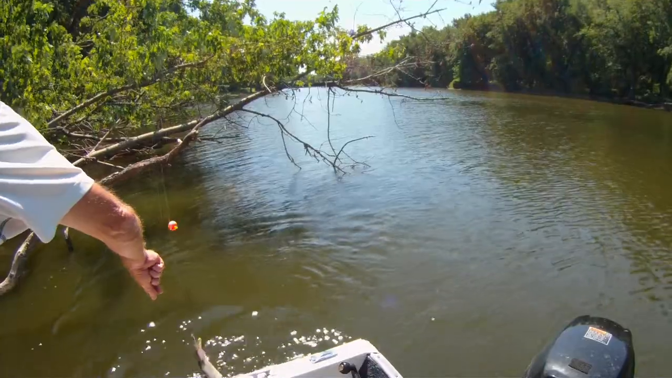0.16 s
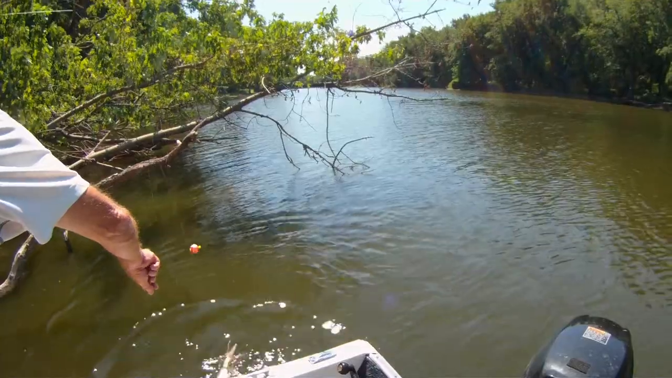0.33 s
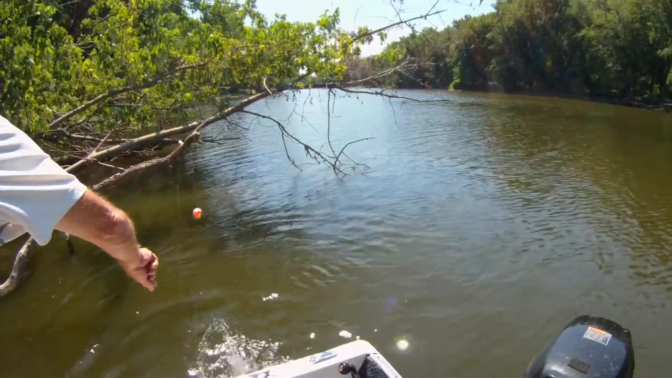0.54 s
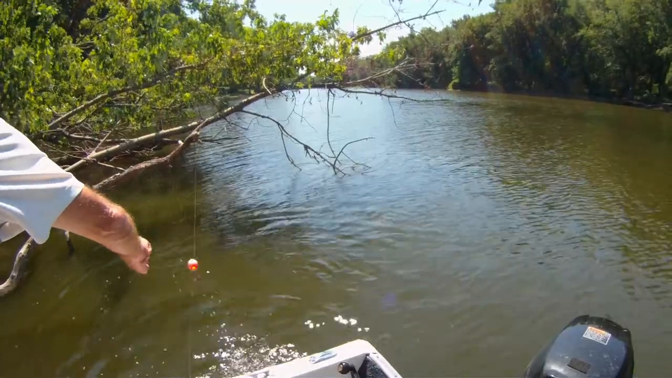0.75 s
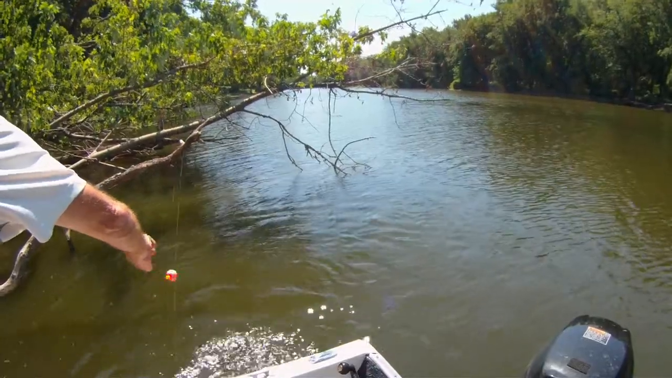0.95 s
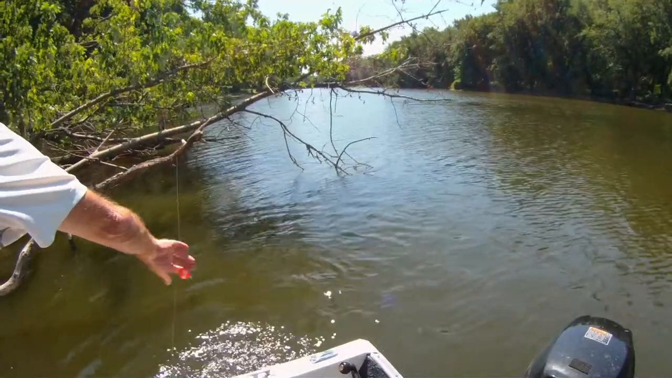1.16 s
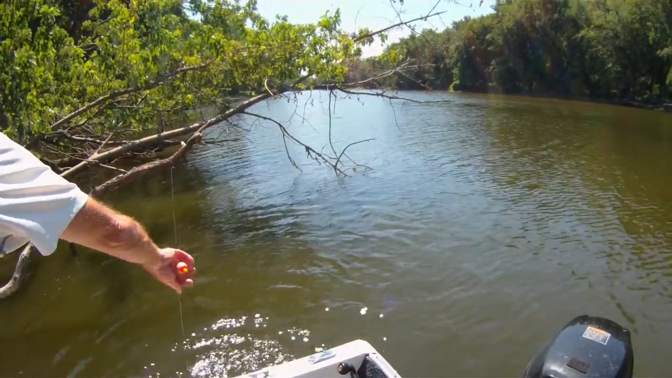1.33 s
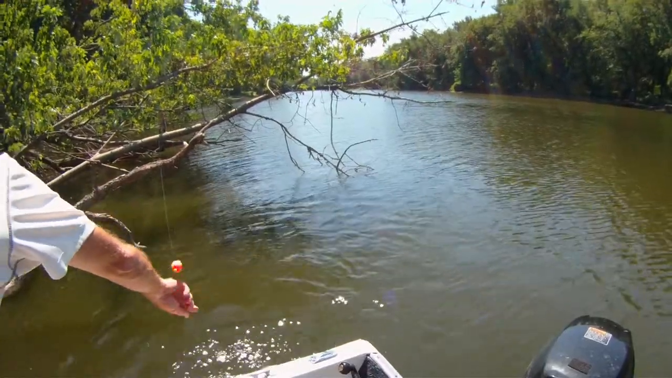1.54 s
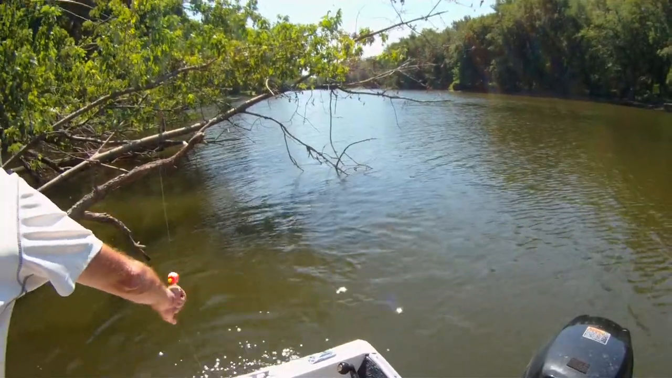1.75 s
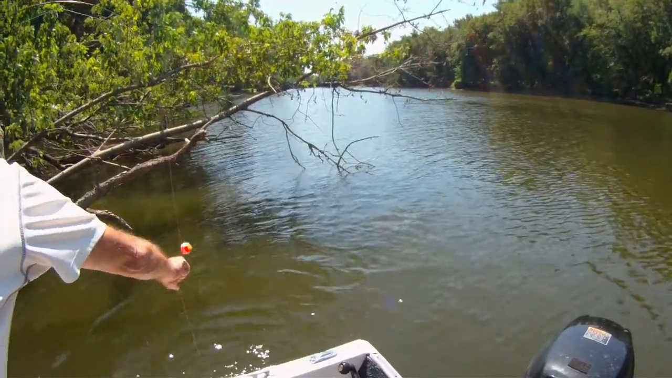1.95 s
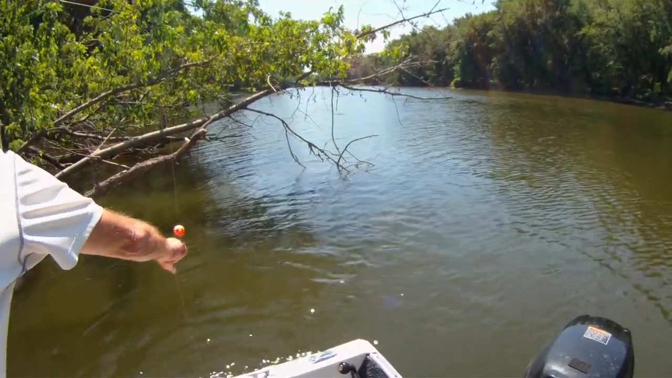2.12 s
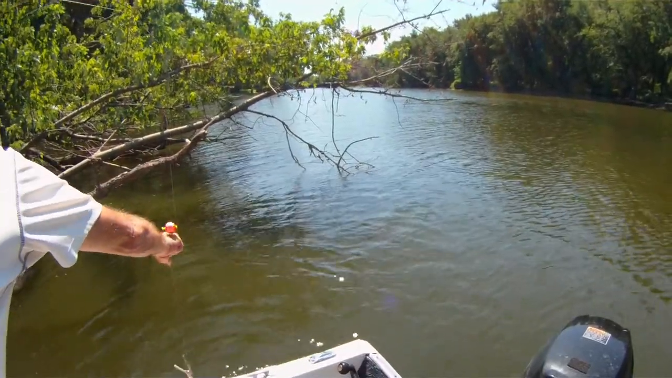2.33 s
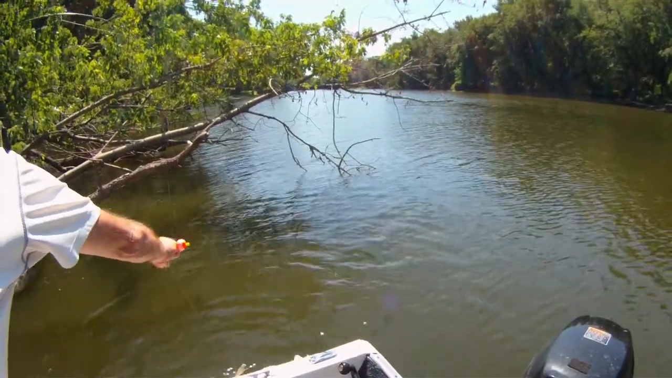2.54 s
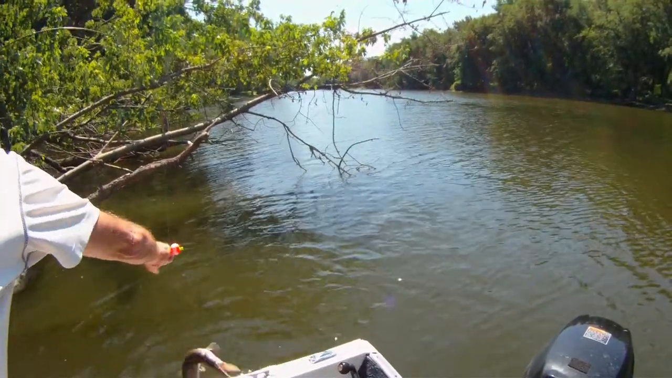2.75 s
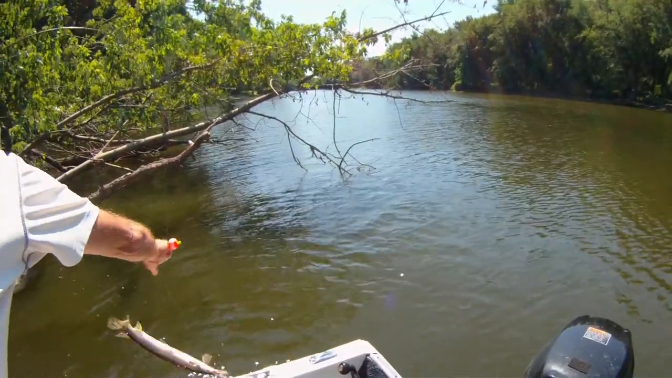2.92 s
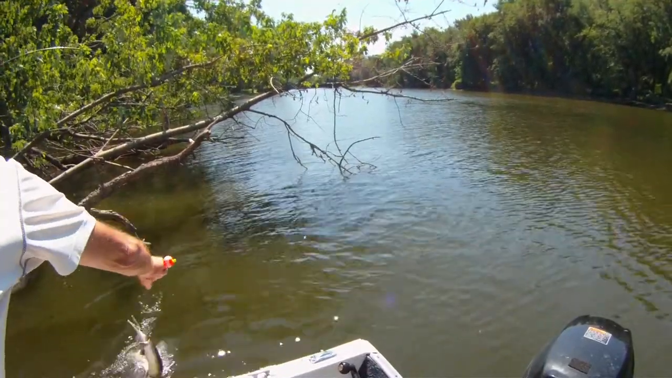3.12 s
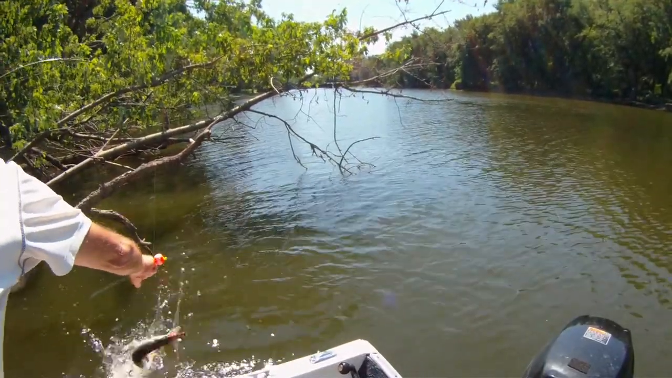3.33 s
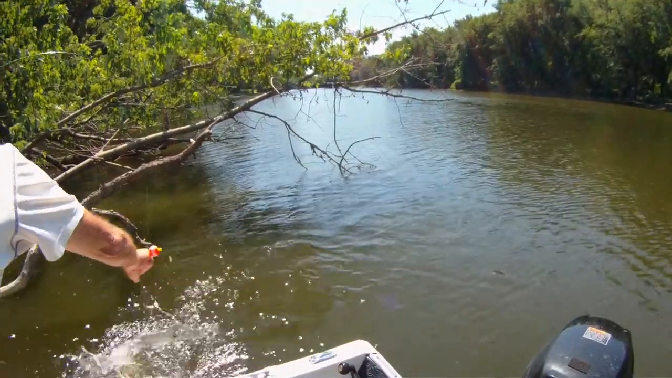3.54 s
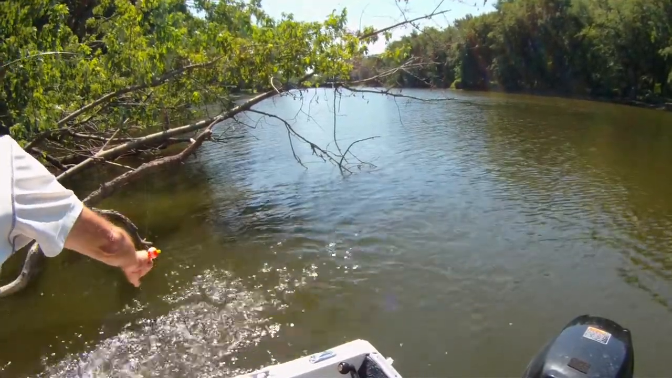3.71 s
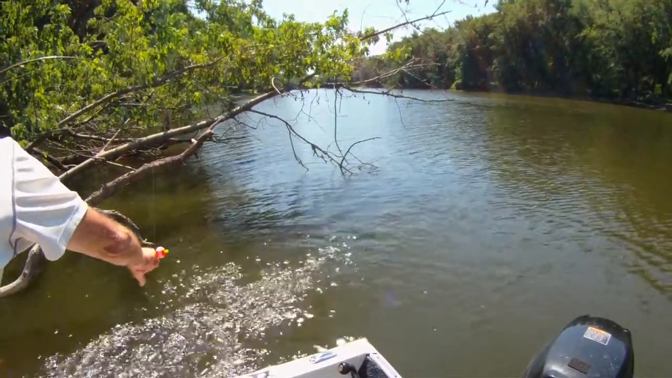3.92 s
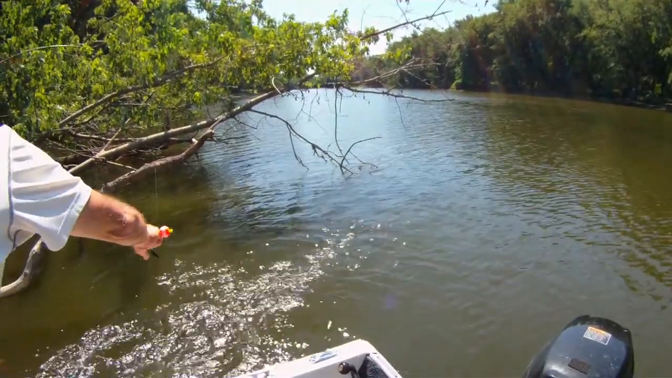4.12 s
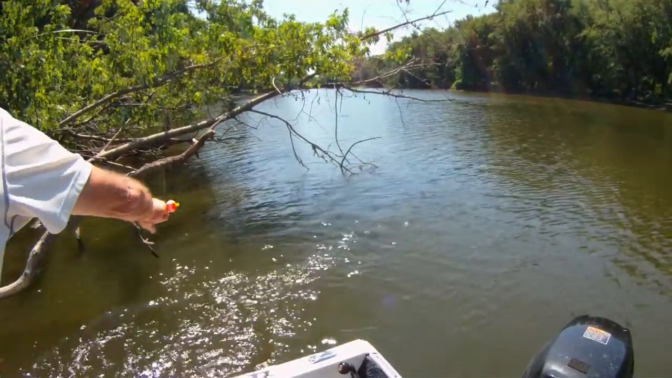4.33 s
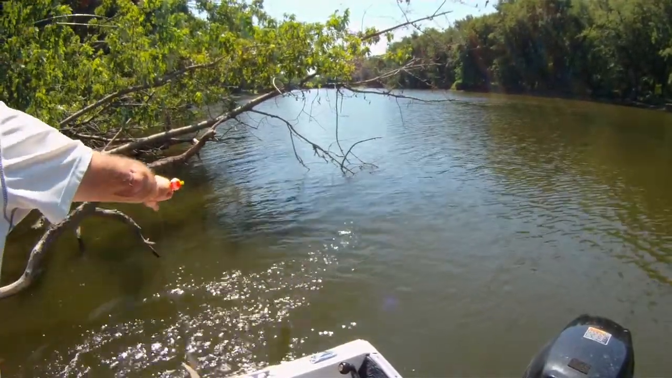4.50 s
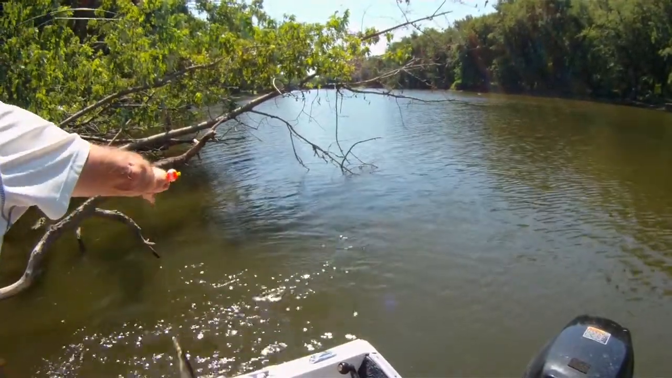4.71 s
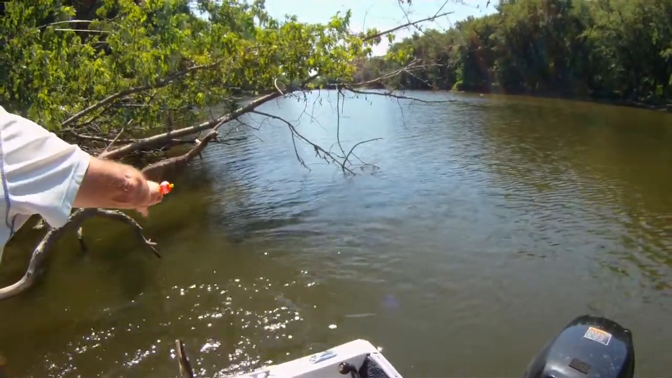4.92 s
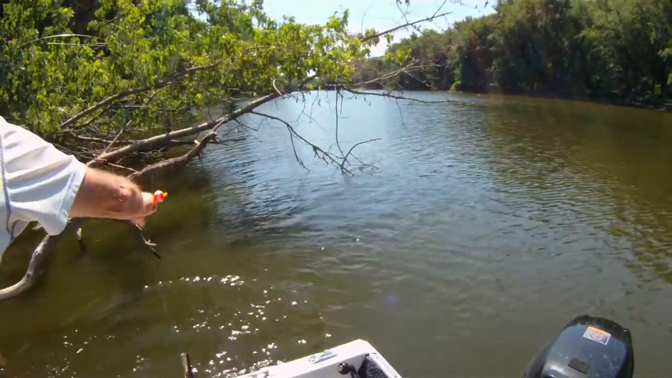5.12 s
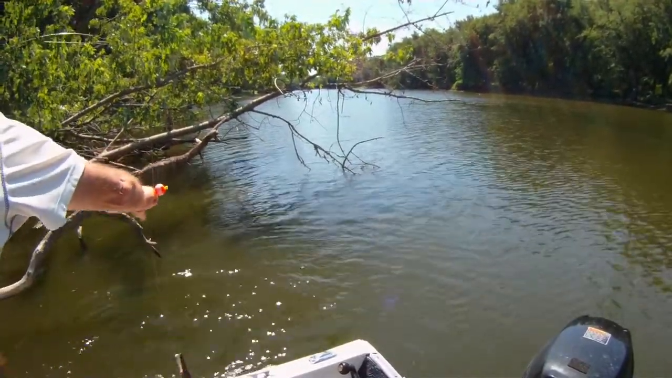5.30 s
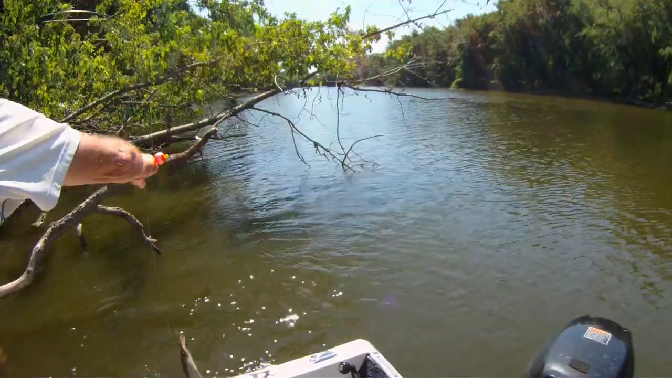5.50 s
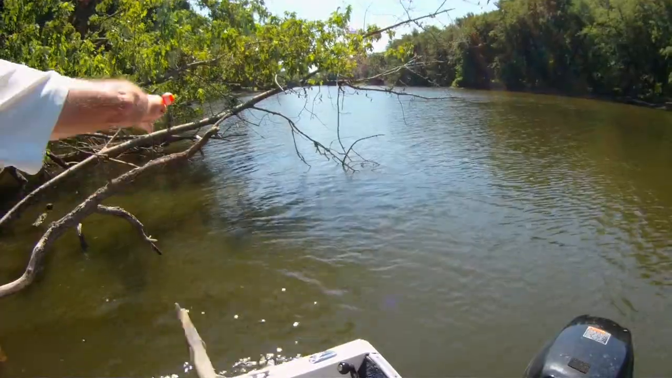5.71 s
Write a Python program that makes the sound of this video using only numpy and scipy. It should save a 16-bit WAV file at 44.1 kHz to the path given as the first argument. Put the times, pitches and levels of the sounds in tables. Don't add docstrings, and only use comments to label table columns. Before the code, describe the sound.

A hooked fish thrashes beside a small boat, with wet slaps, bubbling plops and one sharp crack, over soft river hiss and faint insects.

```python
import sys
import numpy as np
from scipy import signal
from scipy.fft import rfft, irfft, next_fast_len
from scipy.io import wavfile
from scipy.ndimage import uniform_filter1d

SR = 44100
rng = np.random.default_rng(int(sys.argv[2]) if len(sys.argv) > 2 else 0)


def generate_wav(signal):
    frames = np.transpose(np.atleast_2d(signal))
    scaled = np.clip(frames, -1, 1) * 32767
    pcm = np.round(scaled).astype(np.int16)
    wavfile.write(sys.argv[1], SR, pcm)


def invert_db(x):
    u = np.asarray(x, float) / 20
    return 10 ** u


N = 258418
TIME_S = np.arange(N) / SR


def rms_one(x):
    return x / np.sqrt(np.mean(x ** 2) + 1e-20)


def band(x, low_hz, high_hz, order=2):
    edges_hz = [low_hz, min(high_hz, .45 * SR)]
    return signal.sosfilt(signal.butter(order, edges_hz, "band", fs=SR, output="sos"), x)


def resonance(x, hz, width_hz):
    r = np.exp(-np.pi * width_hz / SR)
    zeros = np.array([1, 0, -1]) * (1 - r * r) / 2
    return signal.lfilter(zeros, [1, -2 * r * np.cos(2 * np.pi * hz / SR), r * r], x)


def drift(rate_hz):
    r = np.exp(-80 * np.pi * rate_hz / SR)
    white = rng.standard_normal(N // 40 + 2002)
    slow = signal.lfilter([1], [1, -2 * r, r * r], white)[2000:]
    return np.interp(np.arange(N) / 40, np.arange(len(slow)), rms_one(slow))


def gate(start_s, end_s, fade_s):
    return np.interp(TIME_S, [start_s - fade_s, start_s, end_s, end_s + fade_s], [0, 1, 1, 0])


def add(out, piece, start_s):
    i = max(round(start_s * SR), 0)
    out[i:i + len(piece)] += piece[:N - i]


# pitch_hz, density_db (per Hz)
AIR_SPECTRUM = [(28, -30), (45, -20), (75, -15.5), (140, -9), (250, -10), (450, -11.5), (900, -9),
                (1600, -15.5), (2400, -10.5), (3200, -14), (5600, -5.5), (6650, -13.5), (7000, -16.5),
                (7950, -24)]


def air():
    size = next_fast_len(N)
    points_hz, points_db = np.transpose(AIR_SPECTRUM)
    hz = np.arange(size // 2 + 1) * SR / size + 1
    colour = invert_db(np.interp(np.log(hz), np.log(points_hz), points_db))
    noise = irfft(colour * rfft(rng.standard_normal(size)), size)[:N]
    return invert_db(-52 + 0.16 * drift(3.6)) * rms_one(noise)


# time_s, low_chorus_db, high_chorus_db
INSECT_LEVELS = [(0.0, -56, -76.5), (5.86, -55.5, -77)]


def insects():
    time_s, low_points_db, high_points_db = np.transpose(INSECT_LEVELS)
    low_db = np.interp(TIME_S, time_s, low_points_db)
    high_db = np.interp(TIME_S, time_s, high_points_db)
    white = rng.standard_normal((2, N))
    low = rms_one(resonance(resonance(white[0], 3620, 600), 3620, 600))
    high = rms_one(band(white[1], 4470, 4580))
    return low * invert_db(low_db + 1.5 * drift(13)) + high * invert_db(high_db + .8 * drift(7))


# pitch_hz, width_hz, level_db
HUM_TONES = [
    (60.1, 4.7, -76.5),
    (296.5, 16, -72),
    (189.6, 11, -70),
    (1315, 12, -71),
]
# start_s, end_s
HUM_TONE_SPANS = [(0, 5.86), (.05, 2.7), (4.15, 5.86), (2.35, 2.65)]


def hum():
    out = np.zeros(N)
    for (hz, width_hz, level_db), (start_s, end_s) in zip(HUM_TONES, HUM_TONE_SPANS):
        tone = rms_one(resonance(rng.standard_normal(N), hz, width_hz))
        out += gate(start_s, end_s, .1) * invert_db(level_db) * tone
    return out


# start_s, end_s, pitch_hz, level_db
BIRD_NOTE = (4.49, 4.541, 7580, -60)


def bird():
    start_s, end_s, hz, level_db = BIRD_NOTE
    note = np.sin(2 * np.pi * hz * TIME_S) * invert_db(level_db + 2 * drift(40))
    return gate(start_s, end_s, .004) * note


def bubble(hz, rise_octaves, length_ms, swell):
    u = np.linspace(0, 1, max(round(length_ms * SR / 1000), 8))
    swell = np.clip(swell, .03, .9)
    growth = np.sin(np.pi / 2 * u / swell) ** 1.3
    decay = np.exp(-2.5 * ((u - swell) / (1 - swell)) ** 1.7)
    phase = 2 * np.pi * np.cumsum(hz * 2 ** (rise_octaves * u ** 1.6)) / SR
    return np.where(u < swell, growth, decay) * np.sin(phase)


# start_s, end_s
THRASHING = (.6, 4.5)


def swarm(per_s, low_hz, high_hz, cycles, uneven_db):
    out = np.zeros(N)
    start_s, end_s = THRASHING
    span_s = end_s - start_s
    for when, pitch, size, long in rng.random((round(per_s * span_s), 4)):
        hz = low_hz * (high_hz / low_hz) ** pitch
        gain = invert_db(-uneven_db * np.log(size + 0.07))
        length_ms = 1000 * cycles * (.4 + long) / hz
        add(out, gain * bubble(hz, .5 * long, length_ms, .2), start_s + when * span_s)
    return rms_one(out) * np.sqrt(span_s * SR / N)


# start_s, droplets_db, hold_s, gurgle_rel_db
WATER_SURGES = [(.695, -44.5, .04, -6), (.81, -54, .10, -1.5), (.96, -59, .05, -4), (2.79, -50, .005, 0),
                (2.855, -48, .015, 12), (3.012, -41, .015, 12), (3.10, -55, .03, -4), (3.29, -55, .03, 3),
                (3.385, -42, .03, -14), (3.455, -44, .02, 1), (3.495, -33.5, .05, -2.5),
                (3.56, -33, .045, -3), (3.65, -41, .06, -2.5), (3.73, -41, .055, -7),
                (3.81, -42.5, .07, -4), (3.90, -36.5, .05, -9), (4.0, -47.5, .07, -7), (4.16, -54, .03, -3),
                (4.24, -54, .07, 0.3)]


def surges(levels_db, fall_db_per_s):
    t = np.arange(0, N, 32) / SR
    power = np.zeros(len(t))
    for (start_s, _, hold_s, _), level_db in zip(WATER_SURGES, levels_db):
        swell = np.clip(1 + (t - start_s) / .025, 0, 1) ** 2
        fall_db = fall_db_per_s * np.maximum(t - start_s - hold_s, 0)
        power += (swell * invert_db(level_db - fall_db)) ** 2
    return np.interp(TIME_S, t, np.sqrt(power))


def wash():
    white = rng.standard_normal((3, N))
    gurgle = swarm(420, 620, 1340, cycles=6.5, uneven_db=3.2)
    gurgle = gurgle + 0.7 * rms_one(band(white[0], 560, 1350, order=3))
    droplets = swarm(800, 1300, 3060, cycles=8.0, uneven_db=4.0)
    droplets = droplets + 0.65 * rms_one(band(white[1], 1450, 3280, order=3))
    spray = rms_one(band(white[2], 2600, 7400)) * rms_one(invert_db(2.2 * drift(126)))
    _, droplets_db, _, gurgle_rel_db = np.transpose(WATER_SURGES)
    mix = gurgle * surges(droplets_db + gurgle_rel_db, fall_db_per_s=350)
    mix = mix + droplets * surges(droplets_db, fall_db_per_s=170)
    mix = mix + spray * surges(droplets_db - 6, fall_db_per_s=170)
    return invert_db(-6.5) * mix


# start_s, peak_db, pitch_hz
DROP_BUBBLES = [(.582, -38, 3850), (.698, -30.5, 2760), (1.072, -41.5, 1520), (2.899, -39, 2620),
                (2.985, -27.5, 2040), (3.008, -18, 2176), (3.199, -35.5, 2140), (3.352, -41, 2500),
                (3.385, -31, 2620), (3.42, -32, 2690), (3.470, -35, 2230), (3.482, -17, 2140),
                (3.523, -25.5, 1530), (3.686, -34, 5880), (3.903, -28, 1450), (3.984, -35, 2470),
                (4.011, -34, 2700), (4.025, -37, 4300), (4.075, -42, 1520), (4.106, -39, 4200),
                (4.608, -46, 2500), (4.627, -42, 2220), (4.678, -47, 1580), (4.690, -50, 1480)]


def drop_bubbles():
    out = np.zeros(N)
    for start_s, peak_db, hz in DROP_BUBBLES:
        cycles = 18 - .35 * (peak_db + 35)
        add(out, invert_db(peak_db) * bubble(hz, .05, 1000 * cycles / hz, swell=.27), start_s)
    return out


# start_s, peak_db, start_pitch_hz, rise_octaves, length_ms
CLIMBING_BUBBLES = [(.686, -40, 468, 1.32, 21), (.727, -35, 900, .57, 13), (.817, -46, 1500, .95, 13),
                    (1.096, -51, 2000, .97, 16), (1.127, -51, 740, .5, 42), (1.171, -51, 467, .37, 40),
                    (1.205, -43, 568, 1.56, 55), (3.063, -39, 1960, .39, 10), (3.545, -32, 900, .61, 18),
                    (3.962, -39, 1540, .35, 16), (4.004, -42, 1160, .49, 11.6), (4.098, -45, 150, .65, 37),
                    (4.135, -39.5, 693, .43, 21)]


def climbing_bubbles():
    out = np.zeros(N)
    for start_s, peak_db, hz, octaves, length_ms in CLIMBING_BUBBLES:
        add(out, invert_db(peak_db) * bubble(hz, octaves, length_ms, swell=.5 * octaves), start_s)
    return out


# start_s, peak_db, pitch_hz, length_ms
AIR_POCKETS = [(.715, -24, 770, 9), (.756, -42.5, 1010, 10), (.772, -45, 1000, 10), (.832, -48, 850, 30),
               (.874, -46, 1180, 14), (.884, -45, 1150, 14), (.902, -43, 1000, 12), (.925, -48, 175, 34),
               (.936, -43.5, 480, 15), (2.250, -49, 330, 28), (2.255, -50, 598, 17), (2.763, -48, 930, 18),
               (2.786, -36, 717, 13), (2.860, -28, 332, 15.5), (2.862, -50.5, 110, 40),
               (2.891, -32.5, 1117, 23), (2.983, -24.5, 910, 10.5), (3.011, -16, 760, 5.5),
               (3.010, -50.5, 105, 42), (3.295, -43.5, 610, 18), (3.516, -34.5, 575, 16),
               (3.596, -31, 1010, 7.2), (3.625, -38, 730, 14), (3.688, -34, 835, 13), (3.713, -42, 900, 8),
               (3.884, -37, 1000, 10), (3.944, -40.5, 700, 26), (4.103, -42, 520, 14),
               (5.205, -52.5, 595, 22)]


def air_pockets():
    out = np.zeros(N)
    for start_s, peak_db, hz, length_ms in AIR_POCKETS:
        add(out, invert_db(peak_db) * bubble(hz, .12, length_ms, swell=.25), start_s)
    return out


# start_s, peak_db, plop_rel_db, spray_rel_db
DROP_TICKS = [(0.5818, -35.5, -7, 3), (0.635, -32, -1.5, -7), (0.8106, -36.5, -12, -13),
              (0.8744, -39, -13, -14), (1.0739, -44, -3, -3), (1.0979, -37, -18, -7), (1.1772, -43, -10, 0),
              (1.4194, -47, -7, -4), (1.5396, -44, -18, -8), (1.5562, -41, -13, -5), (2.6873, -46, -15, 8),
              (2.821, -41, -4, 2), (2.941, -41, -10, -13), (3.1832, -37.5, -5, -10), (3.2242, -34.5, -8, 5),
              (3.3226, -35.5, -12, 8), (3.6874, -39, -1, -7), (3.7478, -27, -15, -5), (3.8754, -35, 1, -4),
              (3.9364, -33, -9, -1), (3.9544, -34, -15, -6), (4.0004, -38, -6, -4), (4.0247, -37, -16, 4),
              (4.037, -32, -17, -2), (4.0487, -33.5, -18, -3), (4.1064, -48.5, -9, 4),
              (4.1464, -36, -6, -2), (4.1634, -36.5, -17, 1), (4.2275, -43, -5, -2),
              (5.6976, -39, -38, -12)]
# start_s, peak_db, plop_rel_db, spray_rel_db
FIN_SLAPS = [(0.695, -31, -11, -22), (0.7074, -33, -11, -11), (0.8963, -29, -12, -20),
             (2.8354, -43, 7, -15), (2.8894, -36, -4, -10), (3.1982, -36, -9, -16), (3.3720, -30, -20, 3),
             (3.4815, -21, -2, -20), (3.5587, -29.5, 2, -11), (3.5721, -24.5, -15, -19),
             (3.7553, -23, -14, 2), (3.9032, -25, 1, -14), (3.9117, -27.5, 3.5, 2)]
# start_s, peak_db, weight_db, spray_rel_db
BODY_FLOPS = [(0.9207, -41.5, 4, -9), (2.2462, -46.5, 6, -22), (2.7846, -32, -2, -7),
              (2.8527, -28, 1.5, -7.5), (2.8588, -31, 5, -8), (2.9828, -34, 0, -30),
              (3.0054, -15, -6.5, -13), (3.0270, -33, -1, -16), (3.4830, -33, -1, -20),
              (3.5150, -38, 4, -12), (3.5480, -41, 5, -10), (4.0937, -41, 6, -3)]
REGISTER_EDGES_HZ = [210, 600, 1500, 3200, 8400]


def blow(out, start_s, peak_db, registers_rel_db, decay_ms):
    t = np.arange(round(.1 * SR)) / SR
    white = rng.standard_normal((4, len(t)))
    stretches = [2.16, 1.32, 1.07, 0.98]
    for k, (rel_db, stretch) in enumerate(zip(registers_rel_db, stretches)):
        decay_s = decay_ms / 1000 * stretch
        shape = (1 - np.exp(-t / (0.42 * decay_s))) * np.exp(-t / decay_s)
        burst = band(white[k] * shape, *REGISTER_EDGES_HZ[k:k + 2], order=3)
        add(out, burst * invert_db(peak_db + rel_db - 2.5) / np.abs(burst).max(), start_s)


def slaps():
    out = np.zeros(N)
    for start_s, peak_db, weight_db, spray_db in BODY_FLOPS:
        blow(out, start_s, peak_db, [weight_db + .5, weight_db + .3, 0, spray_db], decay_ms=4.5)
    for start_s, peak_db, plop_db, spray_db in FIN_SLAPS:
        blow(out, start_s, peak_db, [-22, plop_db, 0, spray_db], decay_ms=5.2)
    for start_s, peak_db, plop_db, spray_db in DROP_TICKS:
        blow(out, start_s, peak_db, [-19, plop_db, 0, spray_db], decay_ms=1.6)
    return out


# pitch_hz, peak_db, peak_s, half_length_ms
CAVITY_MODES = [(6000, -25, 3.6, 0.55), (2300, -30, 3, .7), (2050, -12.5, 3.3637, 0.86),
                (2550, -12, 3.3657, 1.6), (2500, -25, 3.3695, 1.5), (3980, -12, 3.3647, 0.89),
                (5930, -5.5, 3.3648, 0.86), (7560, -28.5, 3.3655, 1.5), (1310, -30, 3.365, 1.5),
                (650, -33, 3.366, 2.5)]


def tail_crack():
    out = np.zeros(N)
    half = round(.01 * SR)
    t = np.arange(-half, half) / SR
    for hz, peak_db, peak_s, half_length_ms in CAVITY_MODES:
        shape = np.exp(-(1000 * t / half_length_ms) ** 2 / 2)
        add(out, invert_db(peak_db) * shape * np.sin(2 * np.pi * hz * t), peak_s + t[0])
    shape = np.exp(-(1000 * t / 2.6) ** 2 / 2) * (t > -.0042)
    burst = band(rng.standard_normal(len(t)) * shape, 480, 6500)
    add(out, invert_db(-14) * burst / np.abs(burst).max(), 3.3650 + t[0])
    return out


# pitch_hz, width_hz, boost_db
SPLASH_COLOUR = [(2320, 435, 5.0), (3430, 660, -11), (4150, 680, 9.5), (6000, 390, 10.5), (6850, 640, -5)]


def colour_splash(splash):
    for hz, width_hz, boost_db in SPLASH_COLOUR:
        splash = splash + (invert_db(boost_db) - 1) * resonance(splash, hz, width_hz)
    return splash


def bank_echoes(water):
    t = np.arange(round(.2 * SR)) / SR
    scatter = rng.standard_normal(len(t)) * invert_db(-60 * t / .1) * (t > .014)
    dull = band(water, 500, 6500, order=1)
    return invert_db(-17) * signal.fftconvolve(dull, scatter / np.linalg.norm(scatter))[:N]


def scene():
    background = air() + insects() + hum() + bird()
    bubbles = drop_bubbles() + climbing_bubbles() + air_pockets()
    water = colour_splash(wash() + slaps()) + bubbles + tail_crack()
    return (background + water + bank_echoes(water))[None]


def band_limit(x):
    return signal.sosfilt(signal.butter(12, 16400, fs=SR, output="sos"), x)


def record(dry):
    core = signal.sosfilt(signal.ellip(10, .5, 80, 8050, fs=SR, output="sos"), dry)
    shifted = core * np.cos(2 * np.pi * 7620 * TIME_S)
    fizz = uniform_filter1d(np.abs(band(core, 4500, 8000)), size=40) * rng.standard_normal(core.shape)
    shifted = shifted + invert_db(2.5) * band(fizz, 10500, 13000, order=1)
    treble = signal.cheby1(8, .5, [9800, 15320], "band", fs=SR, output="sos")
    copy = signal.sosfilt(treble, shifted)
    copy = copy + invert_db(8.5) * resonance(copy, 14300, 900) + invert_db(-3) * resonance(copy, 10600, 840)
    cells = signal.stft(copy, nperseg=1024)[2]
    cells = cells / np.sqrt(1 + np.abs(cells) / 0.0017)
    _, rows, columns = cells.shape
    kept = rng.random((rows // 3 + 1, columns // 3 + 1)) > .25
    patches = np.kron(kept, np.ones((3, 3)))[:rows, :columns]
    copy = signal.istft(cells * patches, nperseg=1024)[1][:, :N]
    top = .95
    rounded = top * np.tanh(core / top)
    core = signal.sosfilt(signal.butter(8, 15000, fs=SR, output="sos"), rounded)
    return band_limit(core + invert_db(-25.5) * copy)


dry = scene()
out = record(dry)
generate_wav(out)
```